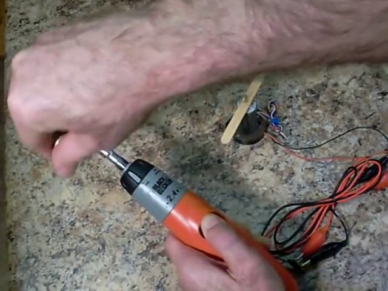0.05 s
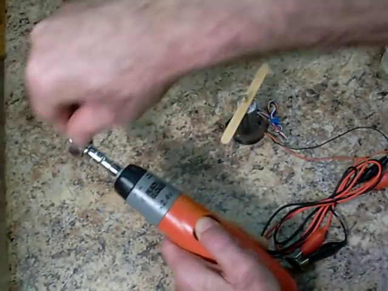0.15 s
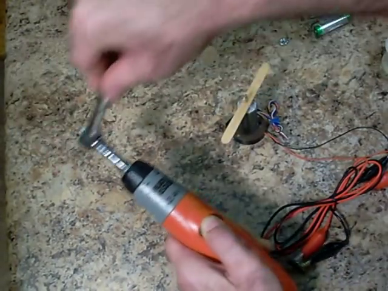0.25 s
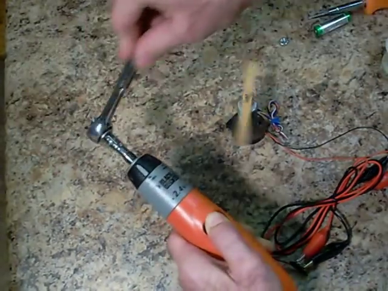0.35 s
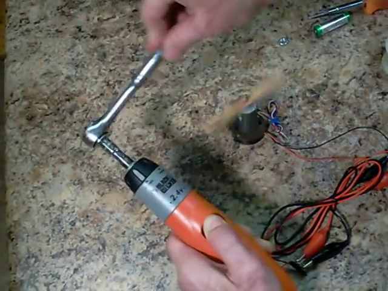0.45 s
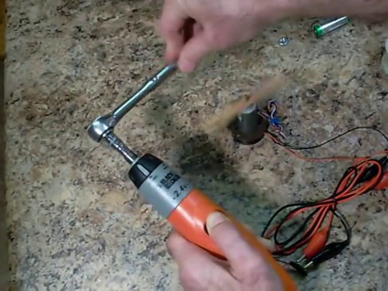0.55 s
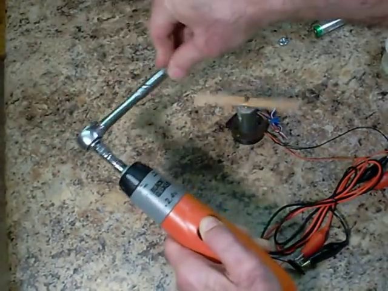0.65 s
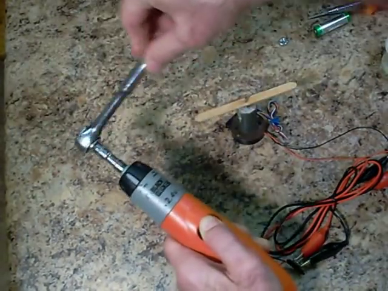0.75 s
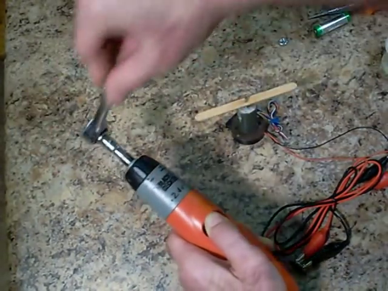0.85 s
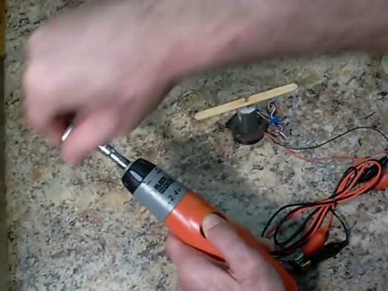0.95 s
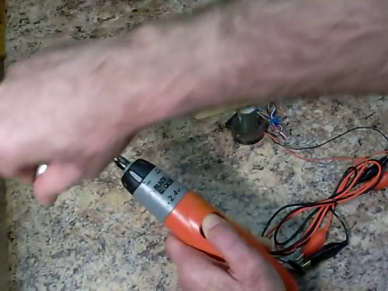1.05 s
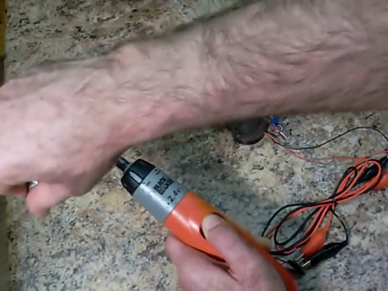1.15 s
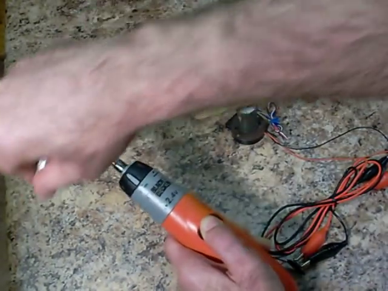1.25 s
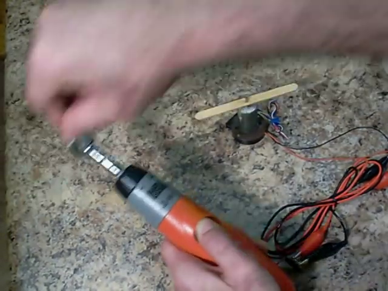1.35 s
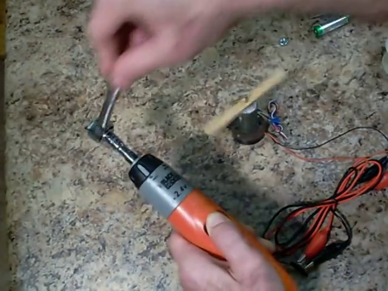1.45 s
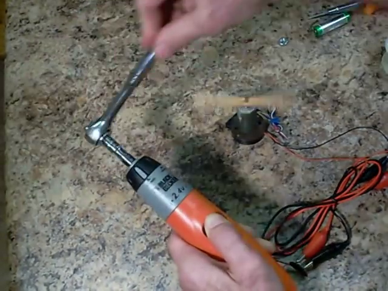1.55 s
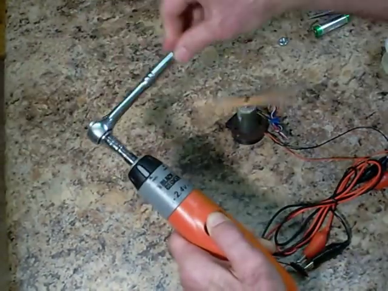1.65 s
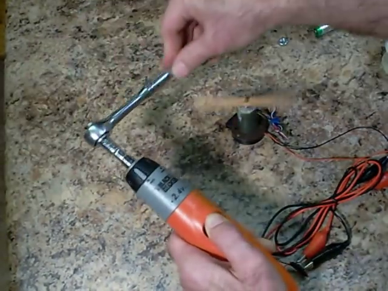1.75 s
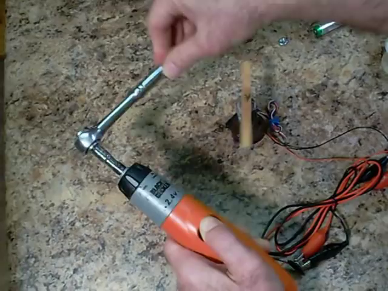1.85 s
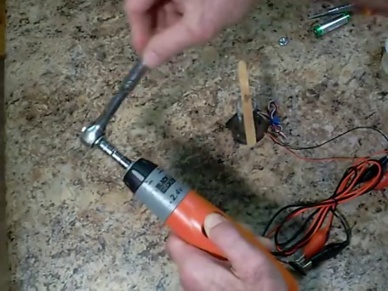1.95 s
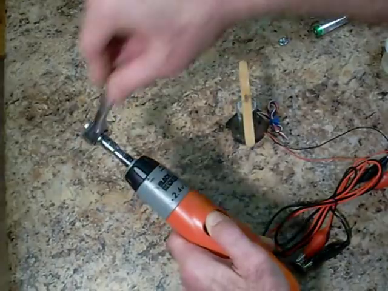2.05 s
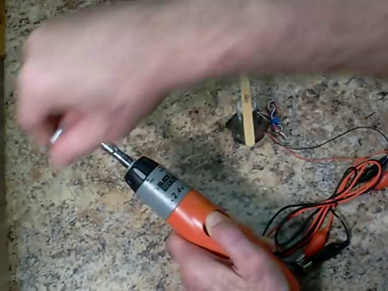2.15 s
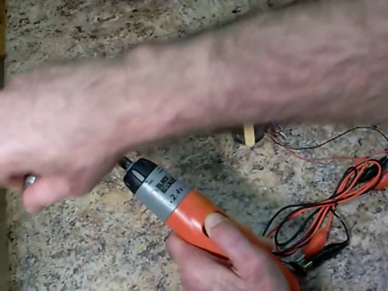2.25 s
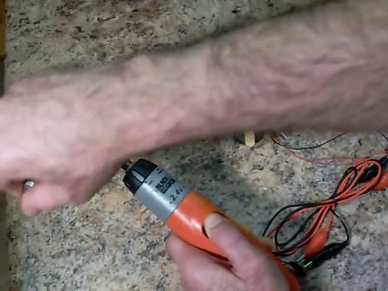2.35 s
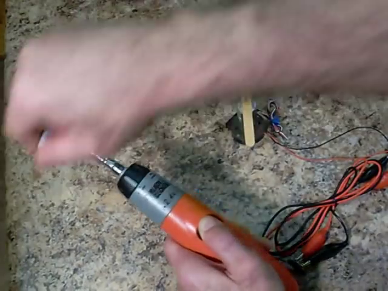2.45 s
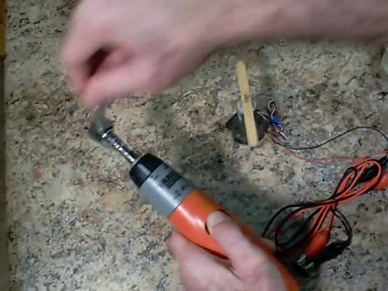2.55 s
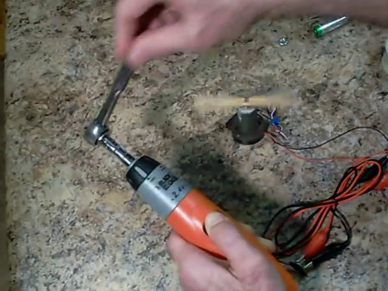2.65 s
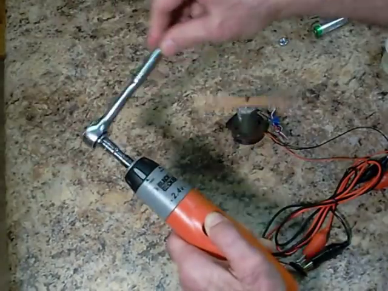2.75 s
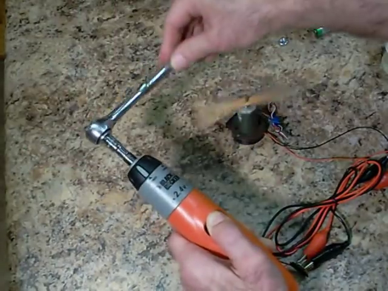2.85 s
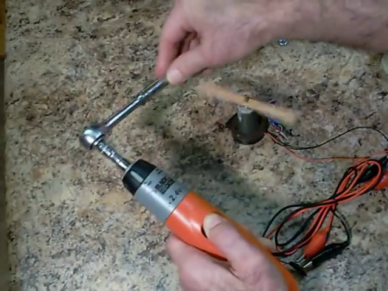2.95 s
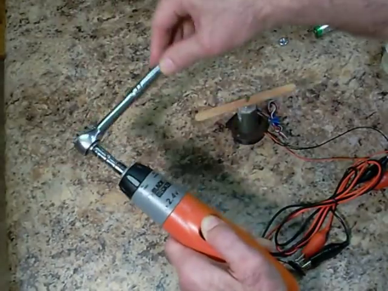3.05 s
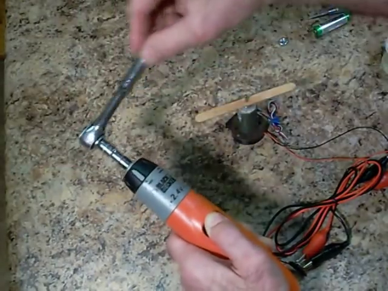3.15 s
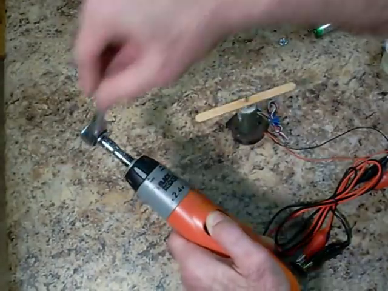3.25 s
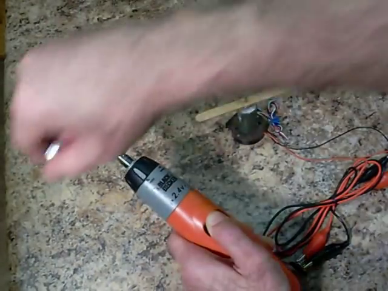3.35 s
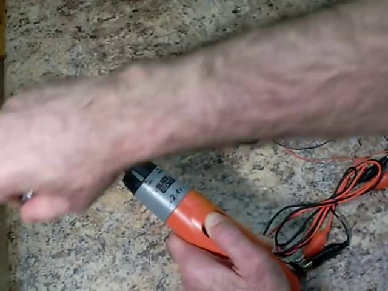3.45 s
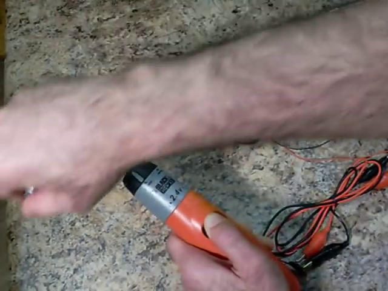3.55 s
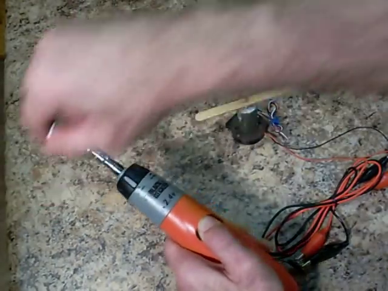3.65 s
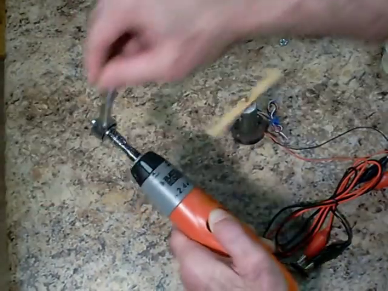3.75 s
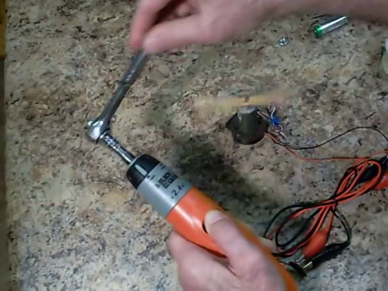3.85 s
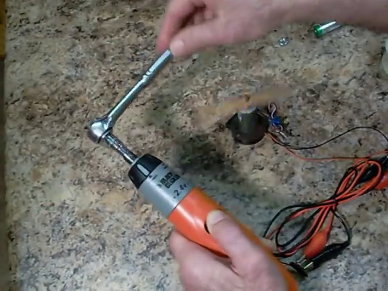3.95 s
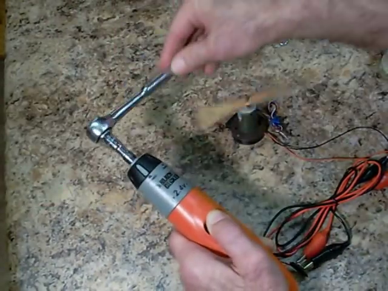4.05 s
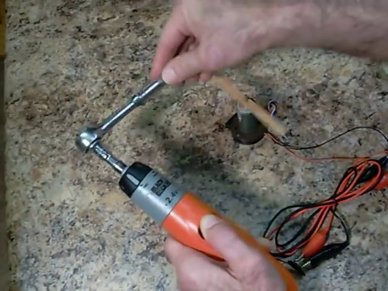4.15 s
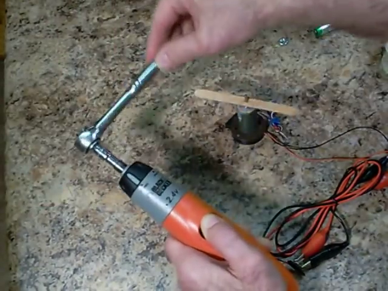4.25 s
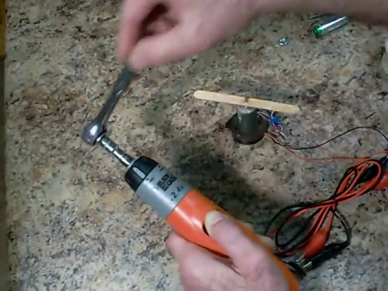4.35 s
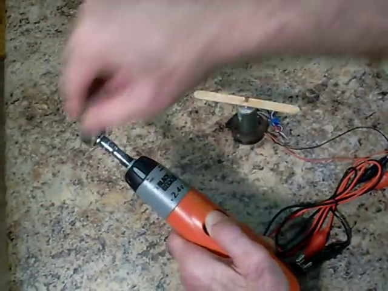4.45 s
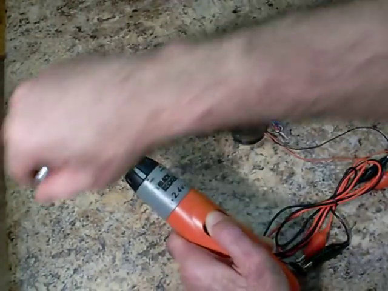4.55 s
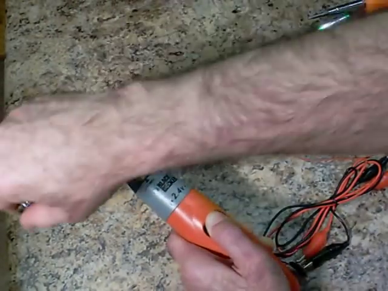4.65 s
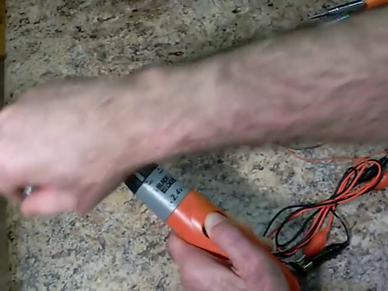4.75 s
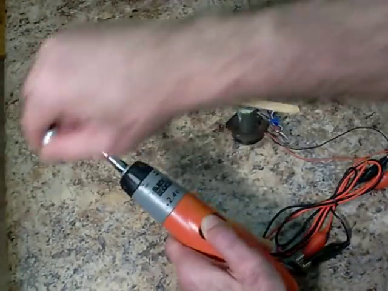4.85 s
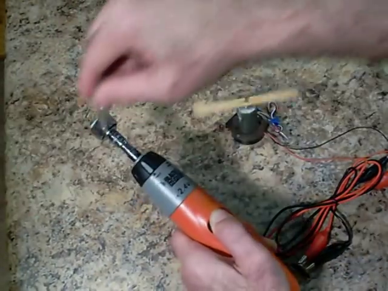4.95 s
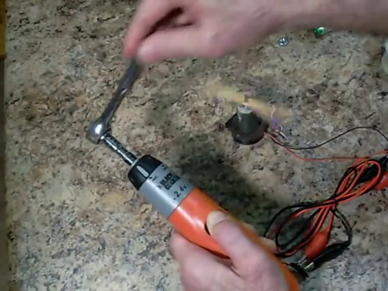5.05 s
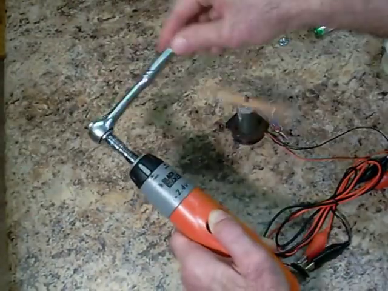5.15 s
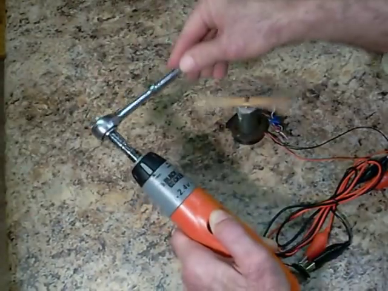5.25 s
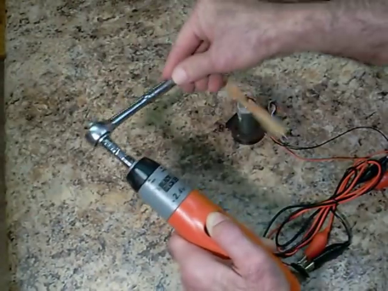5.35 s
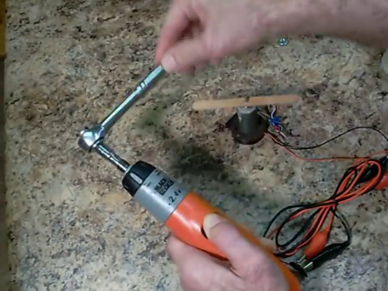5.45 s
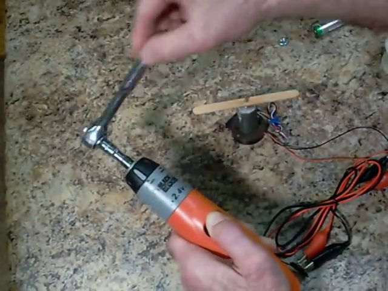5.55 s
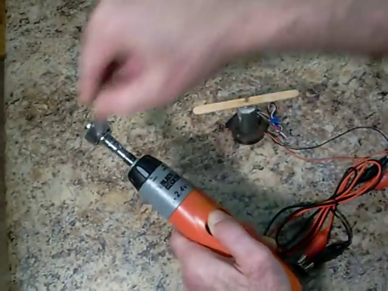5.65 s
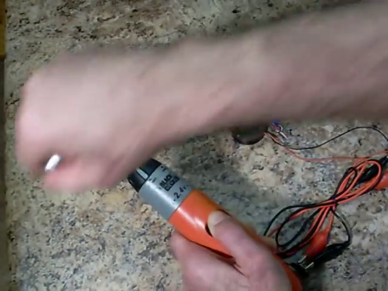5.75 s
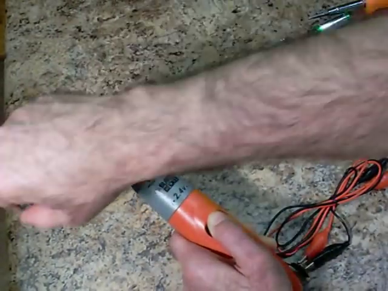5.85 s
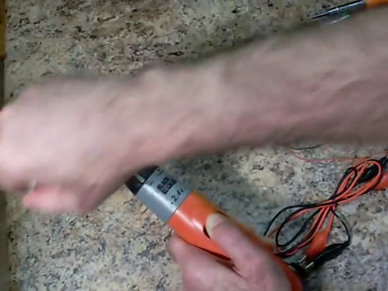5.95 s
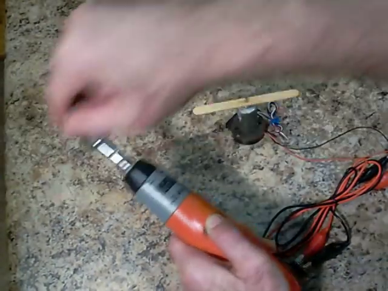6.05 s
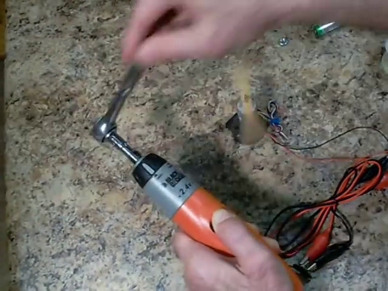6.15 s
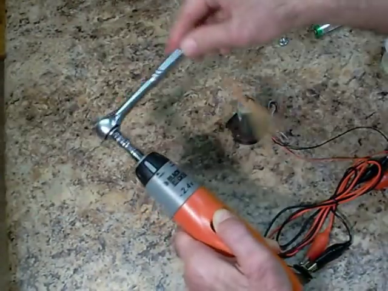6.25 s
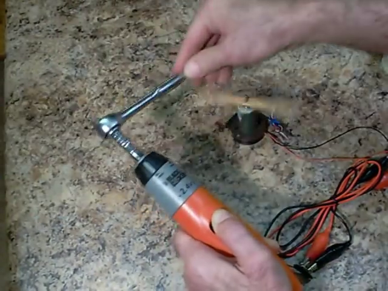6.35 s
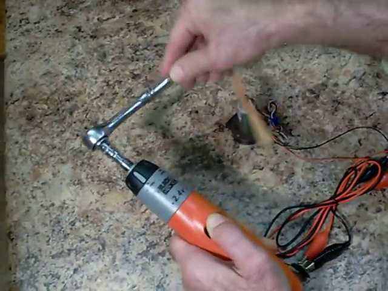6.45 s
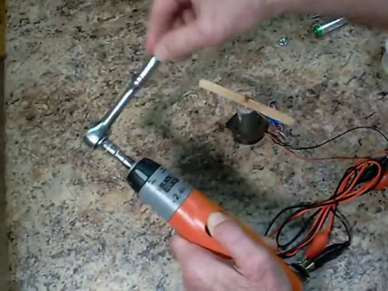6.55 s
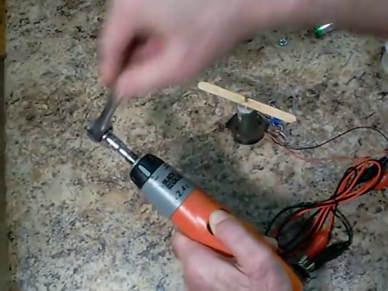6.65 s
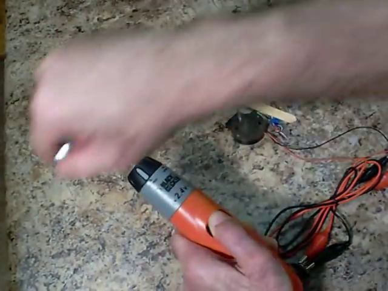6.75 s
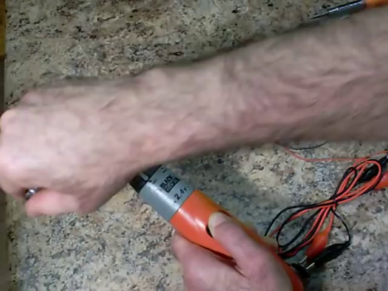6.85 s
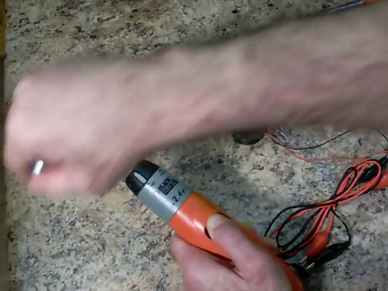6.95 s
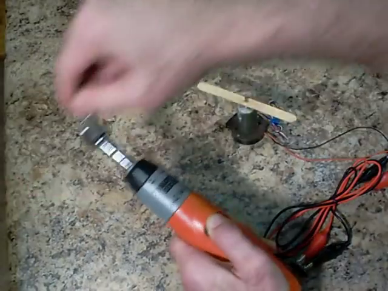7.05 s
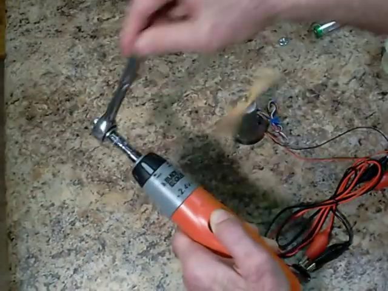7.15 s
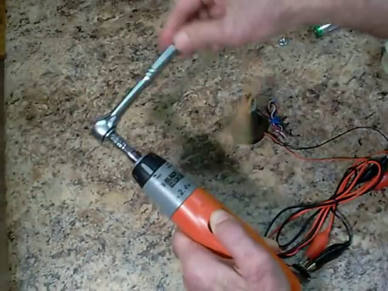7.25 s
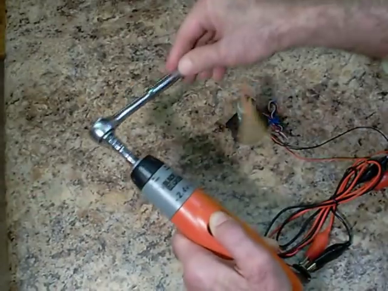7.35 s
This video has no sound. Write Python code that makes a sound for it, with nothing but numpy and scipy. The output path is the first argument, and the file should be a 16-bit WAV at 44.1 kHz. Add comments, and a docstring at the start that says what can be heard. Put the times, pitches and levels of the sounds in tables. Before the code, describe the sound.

Close up in a quiet room, a ratchet wrench turns a small screwdriver by hand. Seven short, gritty gear whirrs, each about a third of a second, come roughly once a second. Between them the wrench swings back with a fast string of bright, ringing clicks that spread out toward the end. Small knocks and sharp tooth snaps mark the turns, over low unsteady rumble and faint thin treble tones.

```python
"""In a quiet room, a small screwdriver is driven backwards by a hand-held ratchet wrench on a counter.
Pulls spin the gear train up into a rattling whirr: dense random impacts filtered by gearbox and shell.
Return strokes let the pawl click over the ratchet teeth, ringing decaying modes of the steel wrench.
Slack taken up against the hand knocks as an impulse into resonances; single gear teeth catch as bursts.
A short room answer, unsteady low rumble, room tone and thin steady treble tones surround the tool."""
import sys
import numpy as np
from scipy import signal
from scipy.fft import rfft, irfft, next_fast_len
from scipy.io import wavfile
from scipy.ndimage import uniform_filter1d, map_coordinates

SR = 44100
rng = np.random.default_rng(int(sys.argv[2]) if len(sys.argv) > 2 else 0)


def wrap_up_sound(samples):
    """Save the sound to the file named by the first command line argument, as 16-bit audio."""
    columns = np.atleast_2d(samples).T
    # keep every value between -1 and 1, then stretch to whole-number steps
    tamed = np.clip(columns, -1, 1)
    steps = np.round(tamed * 32767).astype(np.int16)
    wavfile.write(sys.argv[1], SR, steps)


N = 326424

# Levels are relative; each source adds its own gain.
# pulls of the wrench: start_s, start_rattle_db, full_speed_s, full_speed_rattle_db, let_go_s,
# let_go_rattle_db, rest_s, then relative to the rattle: shell_db, body_buzz_db
PULLS = [(0.33, -47, 0.39, -27, 0.59, -34, 0.68, -5.5, -27.5),
         (1.41, -52, 1.5, -28.5, 1.702, -34, 1.835, -8, -28),
         (2.53, -68, 2.625, -31.5, 2.857, -35, 2.956, -8, -33),
         (3.68, -59.5, 3.786, -27.5, 4.036, -35, 4.16, -8.5, -37),
         (4.89, -48, 4.995, -29.5, 5.21, -32, 5.37, -9, -26),
         (6.055, -46, 6.137, -27.5, 6.306, -32.5, 6.423, -10.5, -27),
         (7.05, -50, 7.155, -27.5, 7.286, -32, 7.42, -10, -25)]
# pawl drops: time_s, peak_db, then relative to it: handle_ring_db, head_ring_db; head_pitch_hz
PAWL_DROPS = [(0.785, -22, -6, -9, 3740), (0.8038, -19, -10, -9, 5230), (0.8206, -15.5, -9, -15, 4470),
              (0.8352, -13.5, -2, -13, 3600), (0.8514, -21, -9, -7, 5100), (0.8745, -23.5, -7, -8, 5260),
              (0.9141, -21.5, -8, -7.5, 3580), (0.9507, -24, -12, -7, 3550), (0.978, -23, -14, -7, 3570),
              (1.008, -22.5, -6, -7, 3720), (1.0496, -24, -12, -4, 4170), (1.1231, -20, -14, -5, 3970),
              (1.9495, -19, -17, -4, 3900), (1.9685, -21, -13, -4, 3600), (1.9889, -18.5, -17, -8, 5050),
              (2.0092, -22.5, -5, -8, 5210), (2.0332, -24, -7, -12, 4880), (2.0575, -21.5, -5.5, -10, 4900),
              (2.0899, -23, -7, -10, 3700), (2.1186, -23, -10, -9, 3500), (2.1479, -24.5, -8, -7, 3720),
              (2.1756, -22.5, -10, -7, 3580), (2.2036, -19.5, -9, -6, 4100), (2.2399, -18, -7, -9, 4100),
              (2.3031, -17.5, -7, -7.5, 3700), (3.1428, -21.5, -4, -11, 4197),
              (3.1644, -20.5, -7.5, -10, 4210), (3.184, -18, -7, -14, 5170), (3.2036, -20.5, -2, -12, 3770),
              (3.2248, -21.5, -13, -12, 4970), (3.2446, -22.5, -4, -13, 3510),
              (3.2653, -27.5, -11, -11, 5300), (3.2894, -25.5, -12, -9, 4870), (3.3114, -28, -10, -6, 3700),
              (3.3343, -24.5, -9, -8, 3580), (3.3572, -30.5, -6, -5, 4100), (3.3854, -31, -13, -3, 3860),
              (3.4181, -25.5, -10, -7, 3670), (3.4703, -25, -10, -7, 4630), (4.3096, -28.5, -7, -11, 4900),
              (4.3291, -23, -4, -9, 4940), (4.3488, -21.5, -4, -10, 4860), (4.367, -20.5, 2, -10, 4920),
              (4.3817, -20, -6, -10, 5100), (4.4014, -24, -10, -10, 4470), (4.4208, -22.5, -19, -7, 3700),
              (4.4457, -23.5, -18, -8, 4930), (4.47, -24, -12, -7, 3800), (4.4933, -26, -7, -8, 3560),
              (4.513, -24.5, -13, -7, 3940), (4.539, -23.5, -5, -6, 3930), (4.5653, -21.5, -6.5, -9, 3850),
              (4.5997, -24.5, -8.5, -9, 3600), (4.6508, -23, -12.5, -5.5, 4220),
              (5.5128, -23.5, -7, -9, 3763), (5.5321, -19, -13, -6.5, 3600), (5.5515, -18.5, -14, -6, 3870),
              (5.5734, -20.5, -4, -10, 5050), (5.5958, -22, 0, -10, 3850), (5.6127, -18, -7, -8, 3710),
              (5.632, -20.5, -7, -8, 3730), (5.6531, -21.5, -10, -11, 4950),
              (5.6752, -23.5, -11, -9.5, 3550), (5.6986, -24, -7, -9, 5190), (5.7217, -20.5, -8, -9, 3800),
              (5.746, -21, -11, -7, 3770), (5.7735, -19.5, -2, -7.5, 4290), (5.8024, -21, -5.5, -6, 4170),
              (5.8474, -21.5, -6.5, -8.5, 3570), (6.553, -22, -4.5, -9, 4912), (6.5706, -24, -4, -11, 4720),
              (6.5874, -28, -8, -8, 4930), (6.6024, -21.5, -6, -11, 3770), (6.618, -23, -14, -10, 4900),
              (6.636, -20.5, -2.5, -13, 3660), (6.649, -24, -7, -12, 5280), (6.668, -23, -11, -10, 5030),
              (6.6883, -29, -12, -9, 5190), (6.7095, -25, -17, -11, 4920), (6.7337, -30, -8, -7, 3790),
              (6.757, -30.5, -9, -6, 3590), (6.784, -26, -13, -6, 3900), (6.8146, -30, -1.5, -9.5, 3920)]
# single gear teeth catching, alone or above the whirr: time_s, peak_db
CATCHES = [(0.224, -13), (0.3316, -25), (0.4822, -6.5), (0.628, -13), (1.3522, -16), (1.5605, -8),
           (1.7115, -8), (1.7962, -25), (2.4615, -35.5), (2.4932, -34.5), (2.572, -26), (2.5958, -23.5),
           (2.6217, -12.5), (2.9306, -24), (3.04, -31.5), (3.6702, -21), (4.2507, -29.5), (4.8608, -28),
           (4.9207, -28), (4.9282, -22), (4.955, -18), (4.9939, -11.5), (5.0774, -15), (5.328, -33),
           (5.4113, -36), (6.0302, -23), (6.0573, -20.5), (6.164, -14.5), (6.196, -17), (7.039, -11.5),
           (7.0835, -24), (7.0993, -20), (7.1701, -15), (7.202, -14), (7.3866, -30)]
# slack taken up against the gripping hand: time_s, thump_db, shell_db (relative to the thump)
KNOCKS = [(0.845, -26, -1.5), (1, -37.5, -9), (1.023, -40, -11), (1.419, -28, 0), (1.496, -34.5, 8),
          (1.971, -31, -2), (2.556, -33, -6.5), (3.146, -34.5, -8), (4.354, -32.5, -7), (4.891, -23.5, -1),
          (6.061, -22, -3.5), (7.044, -22, 0)]
# modes of the steel wrench, three of the socket, six of the head, then the handle: pitch_hz, level_db, t60_s
WRENCH_MODES = [(1150, -7, .008), (1600, -4, .009), (2240, 0, .02), (3250, -4, .012), (3600, 0, .014),
                (3900, -1, .014), (4150, -19, .08), (4250, -3, .02), (4930, -3, .01), (5900, -5, .012),
                (6450, -3, .014), (6750, -4, .014), (7400, -7, .012), (6150, -13, .06), (6200, -11, .075),
                (6230, 0, .013), (6285, -12, .07)]
# resonances of the metal gearbox: pitch_hz, width_hz, level_db
GEARBOX = [(2700, 380, -4), (2950, 280, -0.5), (3560, 520, 1.5), (3994, 266, 3), (4620, 750, 1),
           (5440, 870, 2), (6220, 660, 2), (7050, 1210, -1), (9090, 1030, 3)]
# resonances of the plastic shell: pitch_hz, width_hz, level_db
SHELL = [(690, 350, -21.5), (955, 200, -10.5), (1246, 198, -2.5), (1553, 203, 3), (1675, 216, 3.5),
         (2020, 650, -7.5)]
# resonances of the tool body in the hand: pitch_hz, width_hz, level_db
BODY = [(261, 16, 0), (310, 20, -3), (455, 50, -11), (610, 60, -20)]
# course of the background: time_s, deep_rumble_db, room_hum_db
RUMBLE = [(0.0, -46, -53), (0.04, -46.5, -50), (1.36, -51, -51.5), (1.44, -40, -48.5), (1.73, -48.5, -53.5),
          (2.12, -53, -54.5), (3.11, -54.5, -58.5), (3.15, -58, -55), (3.48, -51.5, -53),
          (3.67, -52, -56.5), (3.77, -42, -52), (4.2, -52, -54.5), (6.33, -54.5, -55), (6.49, -57, -62),
          (7.23, -51, -52), (7.4, -66, -52.5)]
# spectral shape of the room tone: pitch_hz, level_db
ROOM_TONE = [(60, -21), (85, 3), (134, 2), (204, -6), (300, -9), (500, -15.5), (800, -22.5), (1300, -26.5),
             (3000, -30.5), (7000, -51.5), (9000, -25.5)]
# thin steady tones: pitch_hz, level_db
WHINE = [(7316, -70), (7854, -75), (8145, -78), (8689, -87)]
# decay of the room's answer: pitch_hz, t60_s
ROOM_DECAY = [(300, 0.71), (3000, 0.23), (8000, 0.26)]
# microphone response: pitch_hz, gain_db
MIC = [(6800, 0), (7500, -5), (7850, -14), (8050, -22), (8300, -16), (8800, -27), (9200, -47), (9600, -48)]
# spectral shape of the deep rumble: pitch_hz, level_db
DEEP_SHAPE = [(8, -31.5), (20, -4), (35, 2), (62, -2.5), (95, -31.5)]

TOP_HZ = 9765  # band limit
# below full speed the shell loses less than the metal: dB per dB, up to a limit
SHELL_HOLD, SHELL_HOLD_MAX_DB = 0.44, 5.5
# body buzz after a knock: start relative to the thump, fade
BUZZ_DB, BUZZ_FADE_DB_PER_S = -20, 249
CATCH_SHELL_DB = -15.5  # share of a catch that reaches the shell
REST_DB, CORNER_S = -64, .02  # rattle as the gears come to rest; softness of the changes
# socket ring relative to the peak; its scatter from drop to drop; favoured handle pitch
SOCKET_DB, SOCKET_SCATTER_DB, HANDLE_HZ = -23.5, 6.5, 6200


def amp(db):
    """Logarithmic level: decibels to an amplitude gain."""
    return 10 ** (np.asarray(db) / 20)


def unit(x):
    """Power normalisation: x scaled to rms 1."""
    return x / np.sqrt(np.mean(x ** 2) + 1e-20)


def along(points, hz):
    """Logarithmic pitch: (Hz, value) points interpolated on a log frequency axis."""
    f, v = np.transpose(points)
    return np.interp(np.log(hz + 1), np.log(f + 1), v)


def curves(rows):
    """Linear interpolation: one value per sample for each column after the time."""
    s, *cols = np.transpose(rows)
    return [np.interp(np.arange(N) / SR, s, c) for c in cols]


def wobble(rate):
    """Band-limited fluctuation: a smooth random curve with rate knots a second."""
    knots = rng.standard_normal(int(N * rate / SR) + 4)
    return map_coordinates(knots, [np.arange(N) * rate / SR])


def filtered(x, response):
    """Linear filtering: the spectrum of x times a complex response of frequency."""
    m = next_fast_len(N + SR // 2)
    return irfft(rfft(x, m) * response(np.fft.rfftfreq(m, 1 / SR)), m)[..., :N]


def resonances(peaks):
    """Modal superposition: damped oscillators of alternating sign, summed into a causal response."""
    def response(f):
        total = 0
        for k, (centre, width, db) in enumerate(peaks):
            damping = 1j * f * width
            total = total + (-1) ** k * amp(db) * damping / (centre * centre - f * f + damping)
        return total
    return response


def burst(rise, fall):
    """Transient contact: noise that rises and decays exponentially within 10 ms, with energy 1."""
    t = np.arange(SR // 100) / SR
    x = (1 - np.exp(-t / rise)) * np.exp(-t / fall) * rng.standard_normal(len(t))
    return x / np.linalg.norm(x)


def background():
    """Shaped random noise: unsteady deep rumble and hum under a nearly steady upper room tone."""
    deep_db, hum_db = curves(RUMBLE)
    deep = unit(filtered(rng.standard_normal(N), lambda hz: amp(along(DEEP_SHAPE, hz))))
    split_tone = lambda hz: amp(along(ROOM_TONE, hz)) * [hz < 200, hz >= 200]
    hum, upper = filtered(rng.standard_normal((2, N)), split_tone)
    upper_gain = amp(-53.5 + 0.26 * wobble(4.18))
    return amp(deep_db) * deep + amp(hum_db) * unit(hum) + upper_gain * unit(upper)


def whine():
    """Pure tones: a few thin steady sinusoids in the treble, each set by its rms level."""
    t = np.arange(N) / SR
    return sum(amp(db) * np.sqrt(2) * np.sin(2 * np.pi * hz * t) for hz, db in WHINE)


def pull(start, start_db, full, full_db, let_go, let_go_db, rest, shell_db, body_db):
    """Rotational inertia: spin-up, slow sag and run-down set the levels of rattle, shell and body."""
    t = np.arange(N) / SR
    level = np.interp(t, [start, full, let_go, rest], [start_db, full_db, let_go_db, REST_DB])
    level = uniform_filter1d(level, round(CORNER_S * SR))
    shell = level + shell_db + np.minimum(SHELL_HOLD * (full_db - level), SHELL_HOLD_MAX_DB)
    return np.where((t < start) | (t > rest), -120, [level, shell, level + body_db])


def teeth(level_db):
    """Meshing impacts: a higher rattle level packs the contacts closer and adds sliding hiss."""
    rate = 480 * amp(.45 * (level_db + 30))  # impacts a second before the jitter
    turns = np.cumsum(rate * amp(1.5 * wobble(150))) / SR
    impacts = np.diff(np.floor(turns), prepend=0)
    sizes = amp(3.2 * np.clip(rng.standard_normal(N), -3, 2))
    decay = np.exp(-np.arange(SR // 200) / SR / .0004)
    hiss = .3 * rate / 480
    bumps = signal.fftconvolve(impacts * sizes, decay)[:N] + hiss
    bumps /= np.sqrt(rate + 30)  # sparse impacts carry about the same power as dense ones
    bumps /= np.sqrt(np.mean(bumps[level_db > -40] ** 2))
    return bumps * amp(0.95 * wobble(45)) * rng.standard_normal(N)


def patchy(x, depth_db):
    """Spectral fluctuation: a smooth random gain field over time and frequency favours changing pitches."""
    z = signal.stft(x, nperseg=256)[2]
    field = uniform_filter1d(rng.standard_normal(z.shape), size=3, axis=0)
    field = uniform_filter1d(field, size=3, axis=1)
    gain = amp(depth_db * unit(field))
    return signal.istft(z * unit(gain), nperseg=256)[1][:N]


def gears():
    """Forced resonance: tooth contact drives gearbox and plastic shell; noise drives the gripped body."""
    level_db, shell_db, body_db = np.max([pull(*row) for row in PULLS], axis=0)
    for s, db, _ in KNOCKS:  # the body keeps buzzing after a knock
        after = slice(round(s * SR), N)
        since_s = np.arange(N - after.start) / SR
        buzz_db = db + BUZZ_DB - BUZZ_FADE_DB_PER_S * since_s
        body_db[after] = np.maximum(body_db[after], buzz_db)
    contact = teeth(level_db)
    metal = amp(level_db + 8.5) * patchy(contact, depth_db=3)
    plastic = amp(shell_db + 16.5 + 0.72 * wobble(40)) * patchy(contact, depth_db=3)
    for s, db in CATCHES:
        catch = burst(rise=0.00037, fall=0.00096)
        spot = slice(round(s * SR), round(s * SR) + len(catch))
        metal[spot] += amp(db + 13.5) * catch
        plastic[spot] += amp(db + CATCH_SHELL_DB + 26.5) * catch
    body_drive = amp(body_db + 31 + 4.4 * wobble(15)) * rng.standard_normal(N)
    box = filtered(metal, resonances(GEARBOX))
    shell = filtered(plastic, resonances(SHELL))
    return box + shell + filtered(body_drive, resonances(BODY))


def ring(modes, t, near_hz, focus_db):
    """Free vibration: decaying modes of random strength and phase, weakened by focus_db per octave off near_hz."""
    x = 0
    for hz, db, t60 in modes:
        strength_db = db + 0.99 * rng.standard_normal() - focus_db * abs(np.log2(hz / near_hz))
        pitch_hz = hz * (1 + 0.0029 * rng.standard_normal())
        x = x + amp(strength_db - 60 * t / t60) * np.sin(2 * np.pi * (pitch_hz * t + rng.random()))
    x = x * (1 - np.exp(-(t / 0.00092) ** 2))  # the pawl lands over about a millisecond
    return x / np.abs(x).max()


def ratchet():
    """Impact excitation: each pawl drop snaps briefly and rings handle, head and socket."""
    out, snap, t = np.zeros(N + SR), np.zeros(N + SR), np.arange(SR // 6) / SR
    socket, head, handle = WRENCH_MODES[:3], WRENCH_MODES[3:9], WRENCH_MODES[9:]
    for s, db, handle_db, head_db, head_hz in PAWL_DROPS:
        at = round(s * SR)
        socket_db = SOCKET_DB + SOCKET_SCATTER_DB * rng.standard_normal()
        handle_hz = HANDLE_HZ * (1 + .02 * abs(rng.standard_normal()))
        sound = amp(handle_db) * ring(handle, t, handle_hz, focus_db=52)
        sound += amp(head_db) * ring(head, t, head_hz, focus_db=37.5)
        # a negative focus favours the socket modes far from this pitch
        sound += amp(socket_db) * ring(socket, t, 2100, focus_db=-11)
        out[at:][:len(t)] += amp(db - 0.3) * sound
        contact = burst(rise=.0007, fall=0.001)
        snap[at:][:len(contact)] += amp(db + 20.5) * contact
    thin = lambda hz: (1j * hz / (1j * hz + 3000)) ** 3  # so small a part radiates little bass
    return out[:N] + filtered(snap[:N], thin)


def knocks():
    """Impulse response: as the load comes on, the body thumps and the shell clacks."""
    thump, clack = np.zeros(N), np.zeros(N)
    for s, db, shell_db in KNOCKS:
        thump[round(s * SR)] = amp(db + 43)
        clack[round(s * SR)] = amp(db + shell_db + 30)
    # the third shell mode stays out of the clack
    low = amp(2) * filtered(clack, resonances(SHELL[:2]))
    high = filtered(clack, resonances(SHELL[3:]))
    return filtered(thump, resonances(BODY)) + high + low


def walls(x):
    """Reverberation: a diffuse noise tail in which each frequency dies at its own speed."""
    hz, t, z = signal.stft(rng.standard_normal(SR // 3), SR, nperseg=256)
    decay = amp(-60 * t / along(ROOM_DECAY, hz)[:, None])
    tail = signal.istft(z * decay, SR, nperseg=256)[1]
    delayed = np.pad(x, (250, 0))  # samples before the first reflection
    return signal.fftconvolve(delayed, tail / np.linalg.norm(tail))[:N]


def scene():
    """Superposition: the tool close by, the room's short answer to it and the background."""
    tool = ratchet() + gears() + knocks()
    return (tool + amp(-12.5) * walls(tool) + background())[None]


def record(dry):
    """Band limitation: the microphone rolls off the treble, the whine joins, nothing stays above TOP_HZ."""
    heard = filtered(dry, lambda hz: amp(along(MIC, hz))) + whine()
    return filtered(heard, lambda hz: hz < TOP_HZ)


dry = scene()
out = record(dry)
wrap_up_sound(out)
```